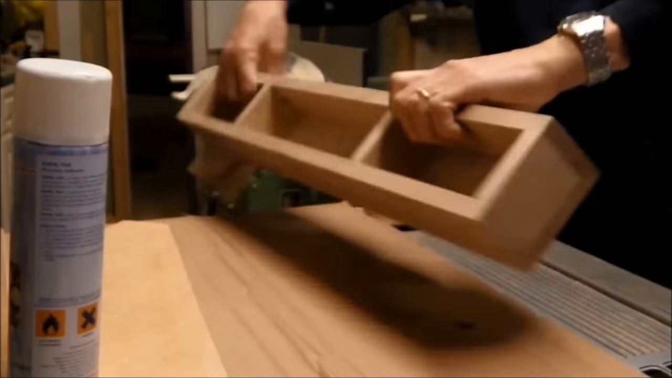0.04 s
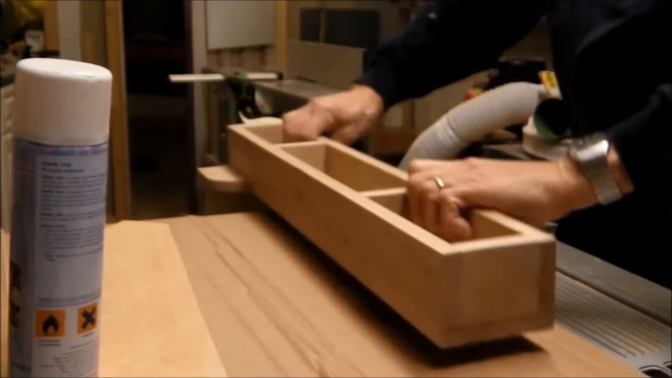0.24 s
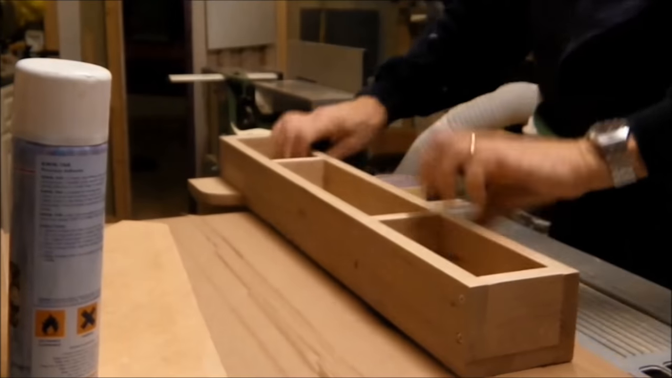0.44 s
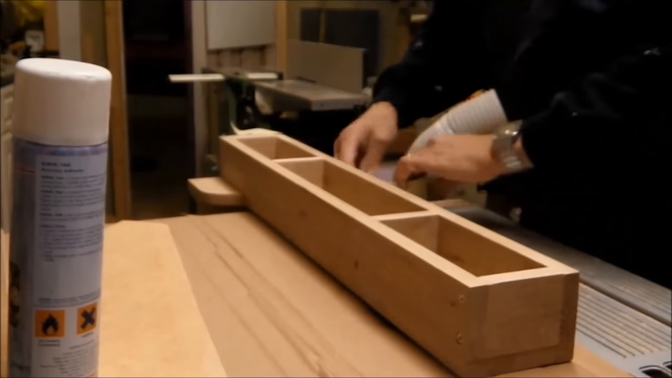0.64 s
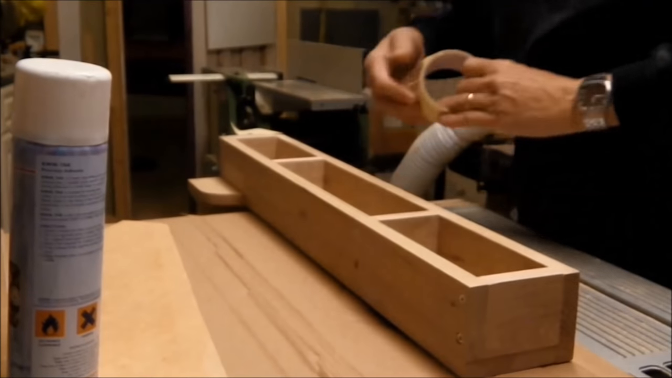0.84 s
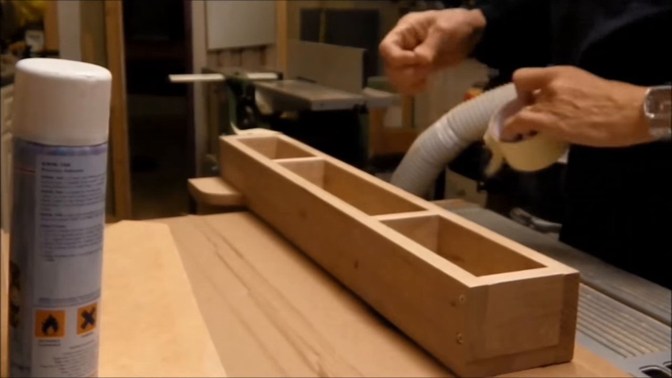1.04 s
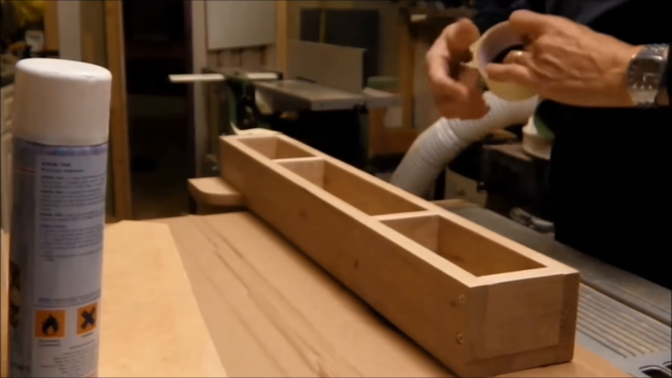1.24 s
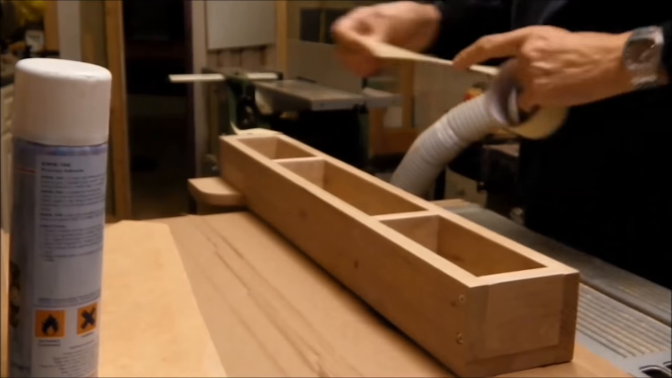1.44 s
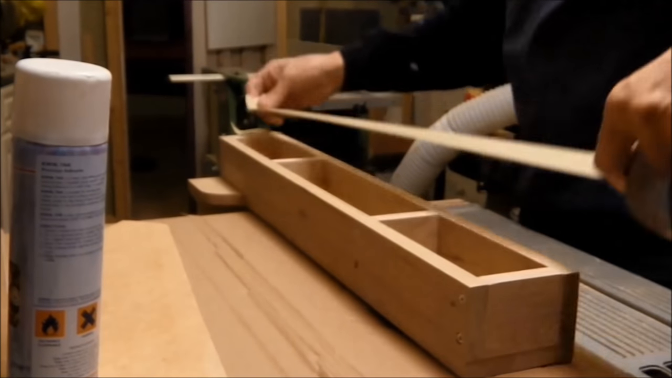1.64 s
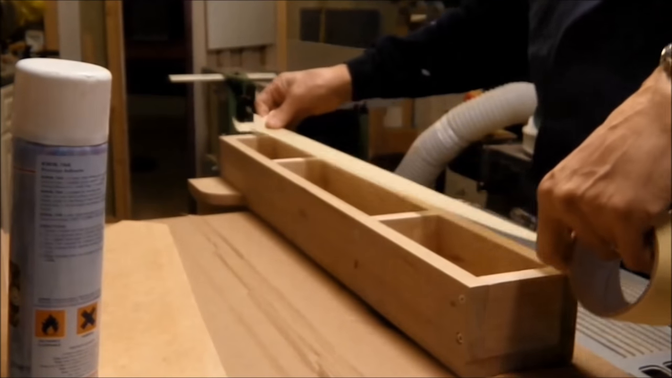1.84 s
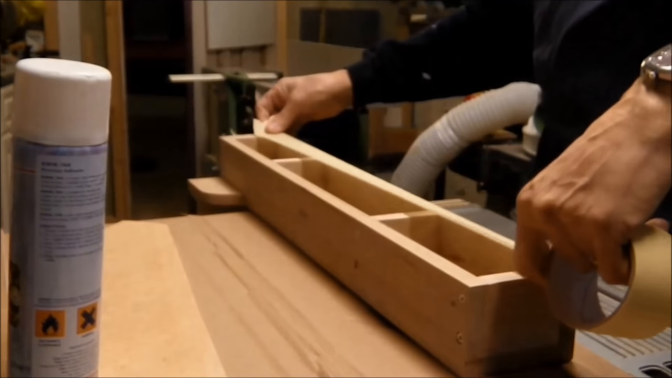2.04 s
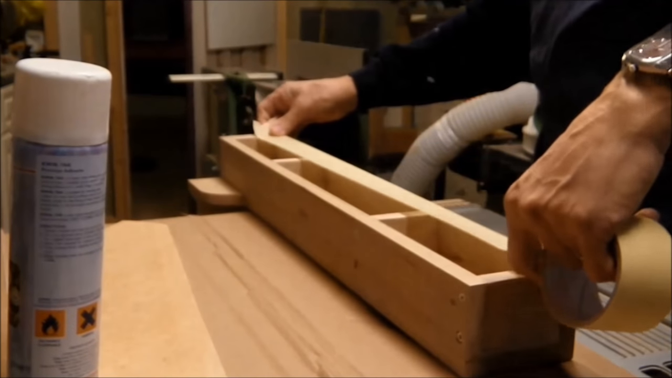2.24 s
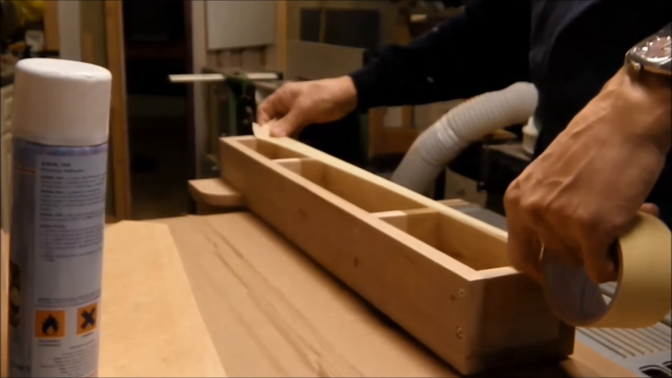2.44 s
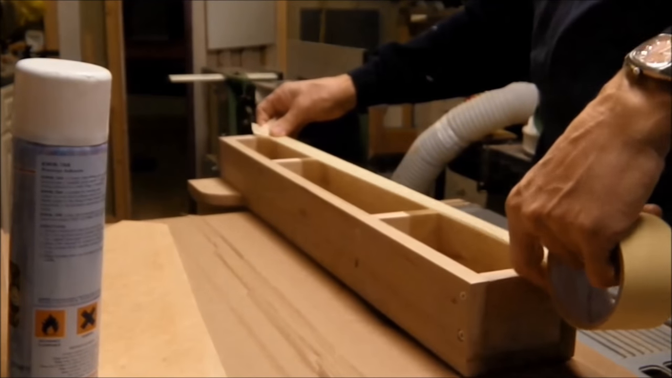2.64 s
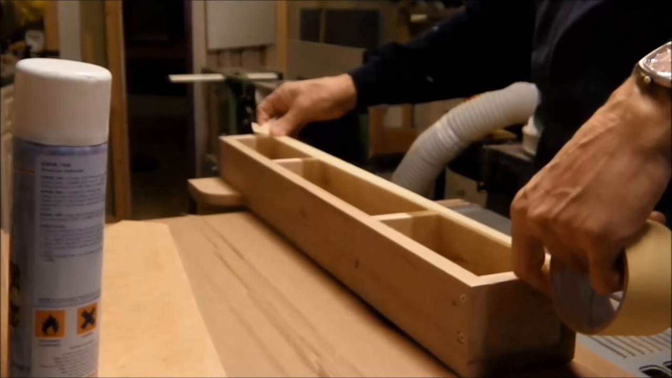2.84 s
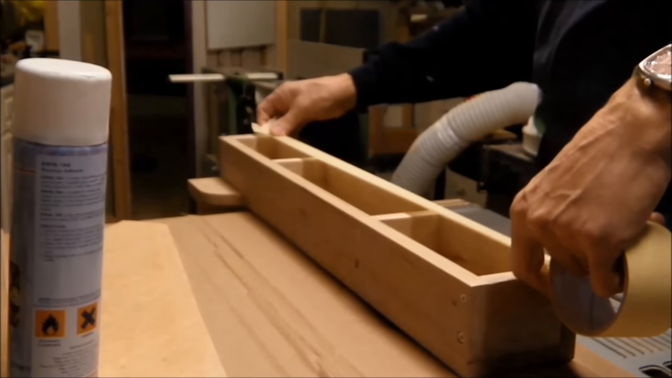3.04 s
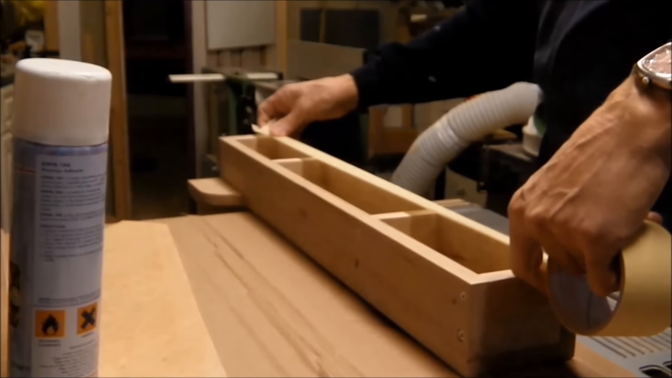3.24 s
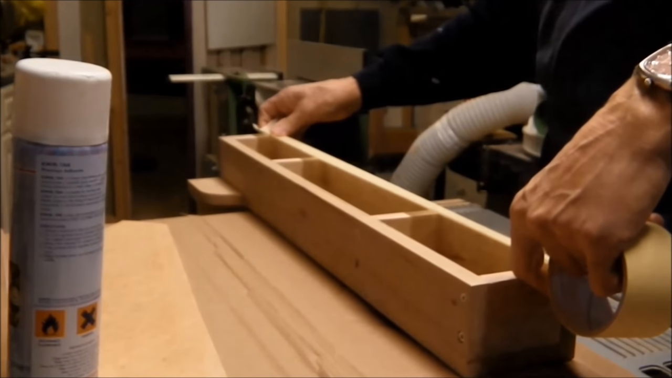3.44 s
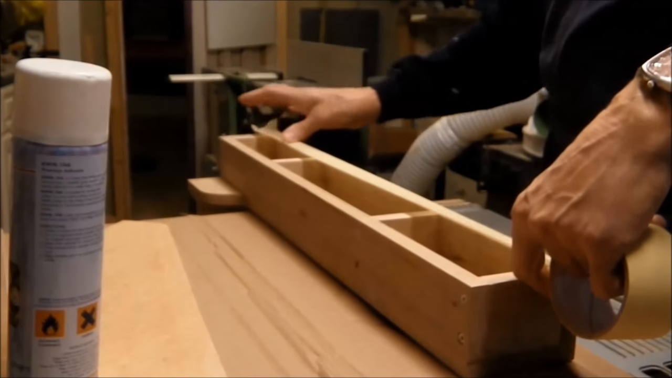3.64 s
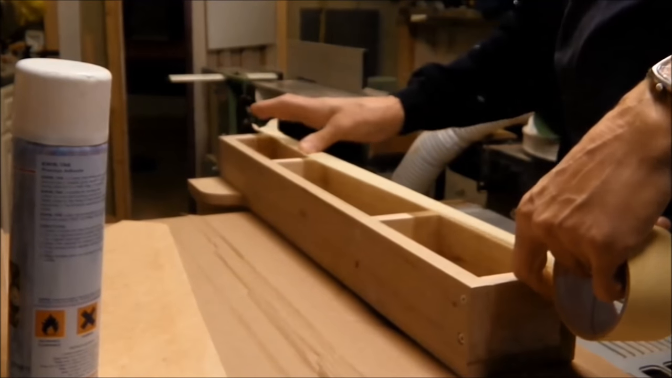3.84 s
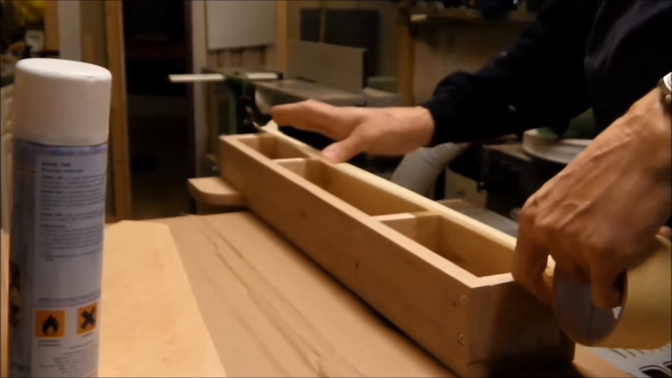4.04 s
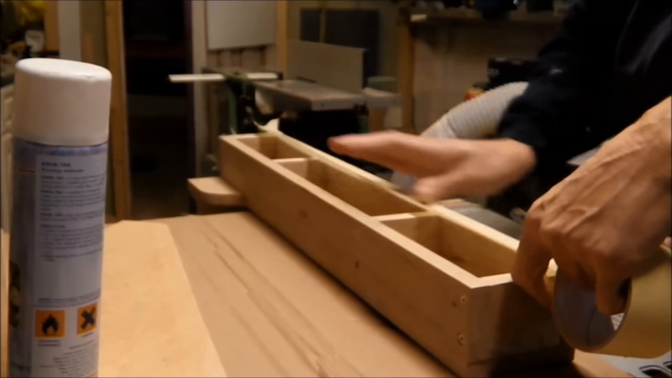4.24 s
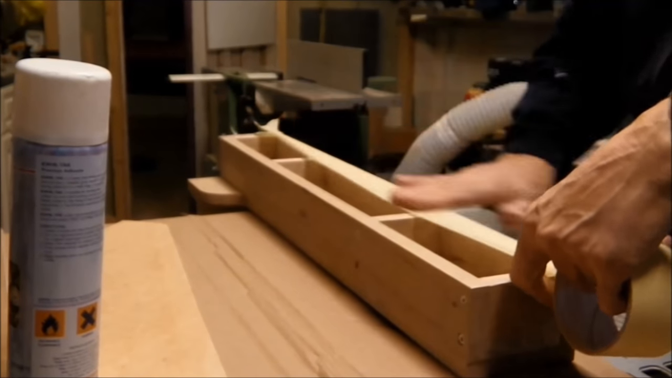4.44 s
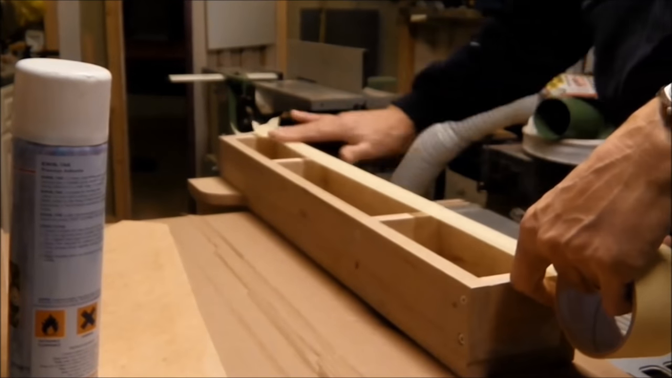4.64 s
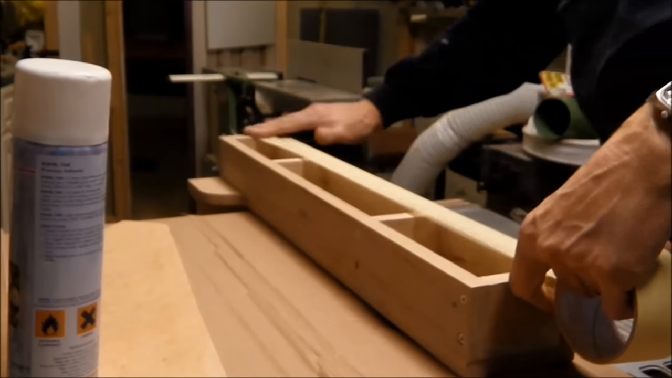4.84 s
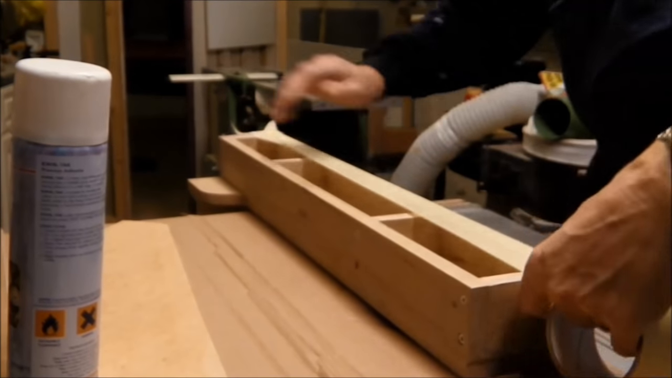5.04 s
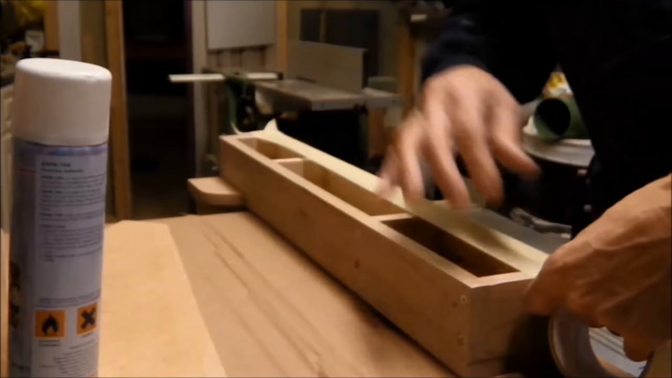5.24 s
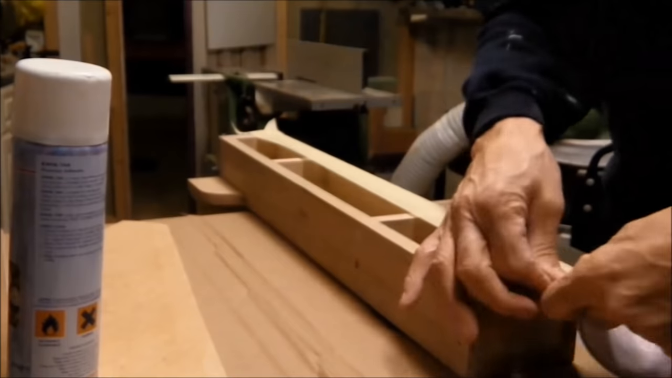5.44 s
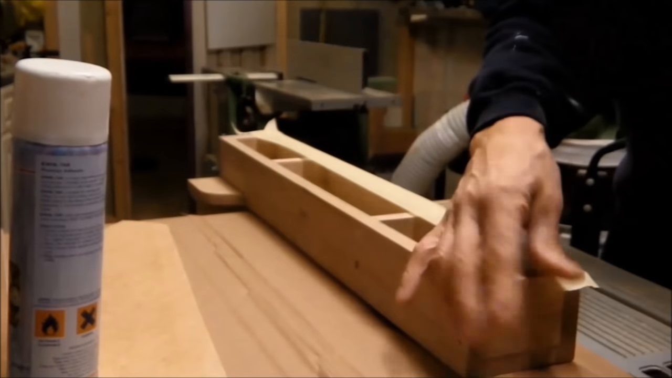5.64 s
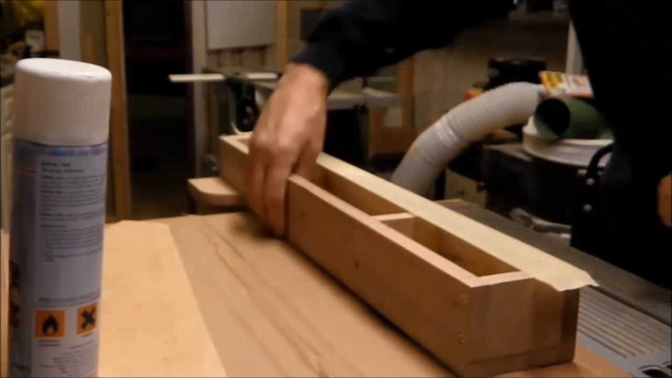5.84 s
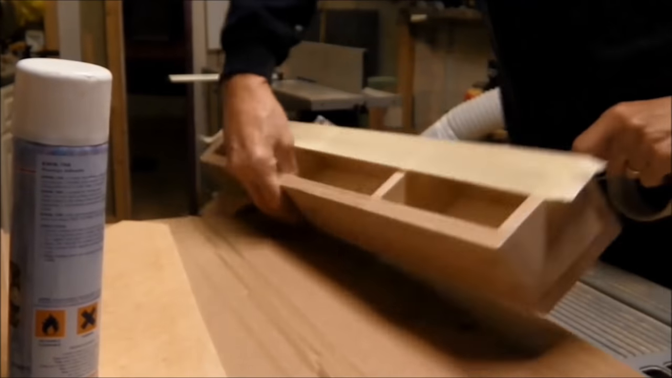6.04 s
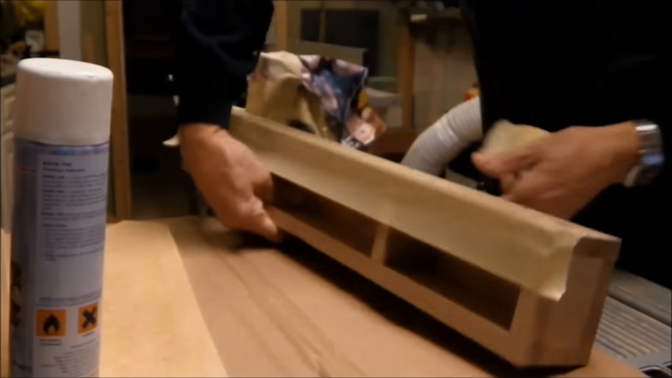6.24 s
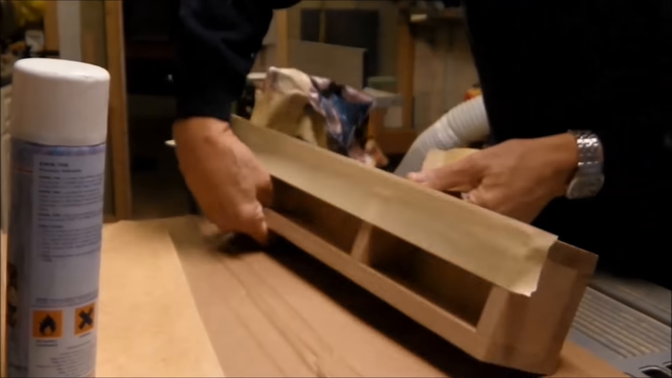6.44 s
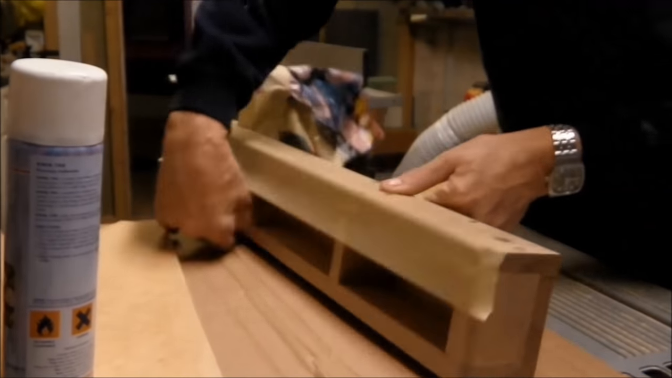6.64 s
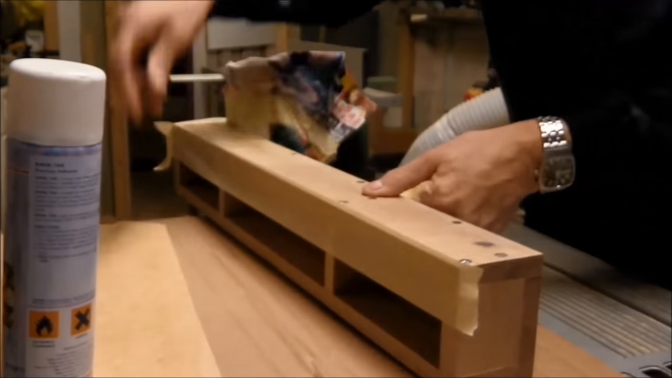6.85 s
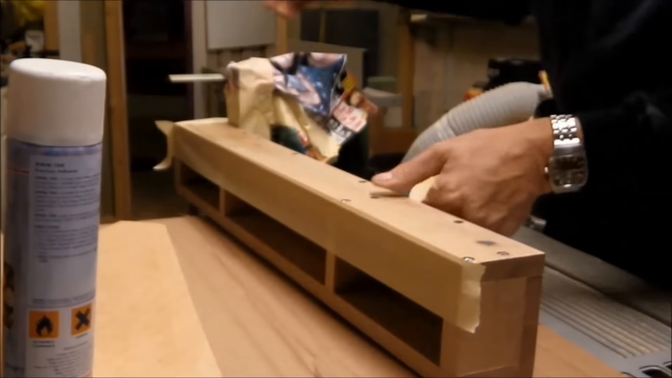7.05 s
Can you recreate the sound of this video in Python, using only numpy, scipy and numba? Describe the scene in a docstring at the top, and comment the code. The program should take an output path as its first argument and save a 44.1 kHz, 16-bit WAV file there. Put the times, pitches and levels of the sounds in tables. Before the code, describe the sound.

In a quiet, faintly humming workshop, tape peels and crinkles, a palm swishes along it, tape snaps off, and a hollow wooden box tumbles with knocks.

```python
"""Taping a wooden box

A wooden box is set down on a workbench; masking tape is peeled off its roll, laid along the box, rubbed down
and torn off; the box is then rolled over with knocks, in a small faintly humming workshop. Rubbing and peeling
are random stick-slip grains, and the treble is bright near 12 kHz; blows are bouncing touches that ring the
modes of what they hit; snapping glue is filtered ticks, and the workshop is coloured noise. Blows and ticks get
a short diffuse tail."""
import sys
import numpy as np
from scipy import signal
from scipy.fft import rfft, irfft
from scipy.io import wavfile
from scipy.ndimage import uniform_filter1d
from numba import njit

SR = 44100
rng = np.random.default_rng(int(sys.argv[2]) if len(sys.argv) > 2 else 0)


def master_out(mix):
    """Clip the mix to full scale and print it as 16-bit PCM to the path in sys.argv[1]."""
    frames = np.transpose(np.atleast_2d(mix))
    ceiling = np.clip(frames, -1, 1)
    pcm = np.round(ceiling * 32767).astype(np.int16)
    wavfile.write(sys.argv[1], SR, pcm)


N = 313551
T = np.arange(N) / SR
# modes of the wooden box: (frequency [Hz], level [dB], t60 [s])
BOX = [(326, -6, 0.068), (490, -4, 0.042), (590, 5, 0.033), (766, 3, 0.014), (1086, 5.5, 0.0081),
       (1497, -4, 0.035), (1785, -2, 0.0099), (2097, 1, 0.0077), (2640, 9, 0.0044), (3220, 6, 0.0038),
       (3760, 6.5, 0.0023)]


def undb(db):
    """Decibels to amplitude."""
    return 10 ** (np.asarray(db) / 20)


def unit(x):
    """Scale to an rms of 1."""
    return x / np.sqrt(np.mean(x ** 2))


def peaked(x):
    """Scale to a peak of 1."""
    return x / np.abs(x).max()


def colour(x, points):
    """Filter to a spectrum given as (Hz, dB) points, joined along log frequency."""
    hz, db = np.transpose(points)
    f = np.fft.rfftfreq(N, 1 / SR) + 1
    gain = undb(np.interp(np.log(f), np.log(hz), db))
    return irfft(rfft(x) * gain, N)


def butter(x, hz, kind, order=4):
    """Butterworth filter with its corners kept inside the usable range."""
    corners = np.clip(hz, 20, .45 * SR)
    return signal.sosfilt(signal.butter(order, corners, kind, fs=SR, output="sos"), x)


@njit
def svf(x, hz, width):
    """Band-pass whose centre may move, gain 1 at the centre."""
    y, band, low = np.empty(len(x)), 0., 0.
    for i in range(len(x)):
        g, k = np.tan(np.pi * hz[i] / SR), width / hz[i]
        v = (band + g * (x[i] - low)) / (1 + g * (g + k))
        band, low, y[i] = 2 * v - band, low + 2 * g * v, k * v
    return y


def noise_band(hz, width):
    """Noise in one fixed resonance, rms 1."""
    return unit(svf(rng.standard_normal(N), np.full(N, 1. * hz), 1. * width))


def walk(rate):
    """Random levels held 1 / rate s and slewed; spread near 1."""
    hold = int(SR / rate)
    steps = np.repeat(rng.standard_normal(N // hold + 1), hold)
    return 1.65 * uniform_filter1d(steps, hold)[:N]


def grains(rate, spread_db):
    """Tiny slips at random moments, rate per second, whose sizes scatter exponentially in dB."""
    chance, size, sign = rng.random(N), rng.exponential(size=N), rng.standard_normal(N)
    return (chance < rate / SR) * sign * undb(spread_db * np.minimum(size, 5))


def ring(x, modes, shares_db=0, detune=1):
    """Decaying modes excited by x; none dies faster than a t60 of 4 ms."""
    out, ones = np.zeros(len(x)), np.ones(len(modes))
    for (hz, db, t60), share_db, shift in zip(modes, shares_db * ones, detune * ones):
        r = np.exp(-np.log(1000) / (max(t60, .004) * SR))
        w = 2 * np.pi * hz * shift / SR
        mode = signal.lfilter([np.sin(w)], [1, -2 * r * np.cos(w), r * r], x)
        out += undb(db + share_db) * mode
    return out


def touch(contact, first):
    """One sharp touch, then an uneven rattle of small bounces that dies over the contact time [s]."""
    size = SR // 4
    bounces = undb(4.4 * np.repeat(rng.standard_normal(size // 64 + 1), 64)[:size])
    push = rng.standard_normal(size) * bounces * np.exp(-T[:size] / max(contact, 2e-4))
    push[0] = first
    return push


def strike(tone, crack, crack_db):
    """A blow is the ringing of the object plus the dry crack of the contact."""
    return peaked(tone) + undb(crack_db) * peaked(crack)


def place(out, s, db, sound):
    """Add a sound at its moment, scaled to its peak level."""
    out[int(s * SR):][:len(sound)] += undb(db) * peaked(sound)


def friction(gains, points, rate, spread_db, patchy_db, box_db):
    """Stick-slip grains: the surface hisses, the object underneath sounds the lower part and rings the box."""
    slips = colour(grains(rate, spread_db), points) * undb(patchy_db * walk(60))
    hiss = unit(butter(slips, 5000, "high"))
    body = unit(butter(slips, 5000, "low"))
    body = unit(body + undb(box_db) * unit(ring(body, BOX)))
    return hiss * gains[0] + body * gains[1]


def pushes(rows, rise, fall):
    """Gains of hiss and body: each push speeds up and slows down along a quarter sine, bent by a power."""
    gains = np.zeros((2, N))
    for start, fastest, end, db, rel_db in rows:
        speed = np.sin(np.pi / 2 * np.interp(T, [start, fastest, end], [0, 1, 0]))
        gains += np.outer(undb([db, db + rel_db]), speed ** np.where(T < fastest, rise, fall))
    return gains


def curve(rows):
    """Gains of hiss and body along a table, silent outside it."""
    s, db, rel_db = np.transpose(rows)
    return undb([np.interp(T, s, v, -200, -200) for v in (db, db + rel_db)])


def taps(rows, modes, rattle_db):
    """Light blows that ring a few short modes, with a dry rattle across them."""
    out, hz = np.zeros(N + SR), np.array(modes)[:, 0]
    for s, db, contact in rows:
        push = touch(contact, 17.4)
        rattle = butter(push, [hz.min() / 1.1, hz.max() * 1.02], "band", order=2)
        blow = strike(ring(push, modes), rattle, rattle_db)
        place(out, s, db, butter(blow, [hz.min() / 1.2, hz.max() * 1.14], "band", order=3))
    return out[:N]


def shop():
    """Smooth hiss over a low rumble with a few wavering hum bands; the hiss shares a part of the rumble's dips."""
    # colour of the workshop's hiss: (frequency [Hz], level [dB per Hz])
    hiss_colour = [(150, -47), (250, -3), (971, -5.5), (1670, -2.5), (1950, -2.5), (5440, -8), (10000, -8),
                   (16000, -9.5)]
    # the workshop's bass: (time [s], level [dB])
    rumble_level = [(0, -62.5), (1.5, -73), (3.2, -77), (5.6, -71.5), (6.1, -68.5), (7.11, -73.5)]
    # colour of the bass: (frequency [Hz], level [dB per Hz])
    rumble_colour = [(20, -13), (59, -8.5), (92, -4.5), (173, -4), (250, -13), (400, -70)]
    # hum bands: (frequency [Hz], width [Hz], level over the plain rumble [dB])
    hum = [(93.4, 7.1, 0), (147, 8, -11), (405, 82, 9.5), (1017, 22, 8.5)]
    # brief dips of the background: (time [s], depth [dB], recovery [s])
    dips = [(1.53, 36, 0.58), (5.66, 28.5, 0.27)]
    fall_s, base_hiss_db = 0.017, -47.5
    s, db = np.transpose(rumble_level)
    rumble_db = np.interp(T, s, db)
    for at, depth_db, recovery in dips:
        rumble_db = rumble_db - np.interp(T, [at, at + fall_s, at + fall_s + recovery], [0, depth_db, 0])
    hiss_db = base_hiss_db + 0.39 * (rumble_db - db.mean()) + 1.33 * walk(4.49)
    hiss = unit(colour(rng.standard_normal(N), hiss_colour)) * undb(hiss_db)
    rumble = unit(colour(rng.standard_normal(N), rumble_colour))
    for hz, width, hum_db in hum:
        rumble += undb(hum_db) * noise_band(hz, width)
    return hiss + rumble * undb(rumble_db)


def echo(dry):
    """Walls and shelves return the sound as a short diffuse tail."""
    t60_s, gap_s = .22, .003
    t = np.arange(SR // 2) / SR
    tail = rng.standard_normal(len(t)) * np.exp(-np.log(1000) * t / t60_s) * (t > gap_s)
    return signal.fftconvolve(dry, tail / np.sqrt(np.sum(tail ** 2)))[:N]


def squeaks():
    """Brief fading tones, blurred by a band of noise that widens the rougher the rubbed edge is."""
    # short narrow squeaks: (start [s], end [s], frequency [Hz], roughness [ratio], rms before the fade [dB])
    squeak_rows = [(2.69, 3.08, 2353, 0.11, -57.5), (5.823, 5.907, 3450, 1.2, -43.5),
                   (5.967, 5.996, 1620, 0.43, -34), (0.26, 0.334, 2860, 1.8, -37),
                   (0.27, 0.325, 4400, 4, -35), (0.584, 0.964, 419, 0.1, -59),
                   (5.614, 5.667, 3370, 3.5, -24.5), (5.833, 5.887, 1432, 1.2, -45.5),
                   (5.854, 5.98, 4060, 6, -47.5), (6.917, 7.106, 1030, 2.085, -53),
                   (6.953, 7.114, 4540, 3, -44), (0.255, 0.321, 1055, 4.6, -34)]
    out = np.zeros(N)
    for start, end, hz, rough, db in squeak_rows:
        gate = np.clip(np.minimum(T - start, end - T) / 0.0097, 0, 1)
        tone = np.sin(2 * np.pi * hz * T) + rough * noise_band(hz, hz * (1 + rough) / 60)
        fade_db = -6.0 * min(rough, 1) * np.clip((T - start) / (end - start), 0, 1)
        out += undb(db) * gate * unit(tone) * undb(fade_db)
    return out


def slide():
    """The box slides on the bench: its wood scrapes and resonates with every push."""
    # pushes: (start [s], fastest [s], end [s], surface hiss [dB], body minus hiss [dB])
    slide_rows = [(0, .06, 0.19, -34, -7.5), (.14, .17, 0.21, -33, -19), (.195, .215, 0.29, -43, 6.5),
                  (.24, .295, 0.37, -40, 4.5), (.26, .42, 0.63, -31.5, -4), (.56, .68, 2, -51, -2),
                  (5.96, 6.0, 6.07, -33.5, -3.5), (6.04, 6.09, 6.28, -31.5, -9),
                  (6.16, 6.27, 6.34, -25, -7.5), (6.3, 6.4, 6.66, -34, 1.5), (6.5, 6.6, 6.74, -25.5, -8),
                  (6.6, 6.74, 7.19, -32, -5), (6.91, 7.0, 7.14, -46, -3)]
    # colour of box on bench: (frequency [Hz], level [dB per Hz])
    slide_colour = [(180, -56), (300, -25.5), (885, -9.5), (1870, -4.5), (2140, -3.5), (2740, -6.5),
                    (12300, 16), (16000, 10.5)]
    gains = pushes(slide_rows, rise=1.5, fall=2.35)
    return friction(gains, slide_colour, rate=9000, spread_db=2.0, patchy_db=1.6, box_db=2.5)


def clinks():
    """Harder, brighter blows on the bench's metal rail: its modes, each slightly detuned at random per blow."""
    # touches of box and rail: (time [s], peak [dB], high modes minus low modes [dB], length of the contact [s])
    clink_rows = [(0.0055, -18, -3, 0.0079), (0.204, -17.5, 7, 0.0075), (6.2364, -9, 5.5, 0.009),
                  (6.354, -10, -2, 0.0041), (6.441, -15, 0, 0.0045), (6.689, -9.5, 3, 0.0065),
                  (6.836, -3.5, 2, 0.0084), (6.855, -11.5, 3, 0.0074), (7.011, -24, -4, 0.0053)]
    # modes of the rail: (frequency [Hz], level [dB], t60 [s])
    rail = [(1013, -0.5, 0.055), (1242, 3.5, 0.04), (2204, 3.5, 0.023), (4330, -1, 0.021),
            (4750, -1.5, 0.018), (6000, 2.5, 0.019), (6475, -2, 0.039)]
    out, high = np.zeros(N + SR), np.array(rail)[:, 0] > 3000
    for s, db, high_db, contact in clink_rows:
        push = touch(contact, 8.5)
        tone = ring(push, rail, high_db * high, 1 + 0.013 * rng.standard_normal(len(high)))
        crack = butter(push, [900, 8000], "band", order=2)
        place(out, s, db, strike(tone, crack, -4.0))
    return butter(out[:N], 690, "high")


def knocks():
    """Blows favour box modes near their pitch, each detuned and scattered in level at random; plus a crack."""
    # blows on the box: (time [s], peak [dB], favoured pitch [Hz], length of the contact [s])
    knock_rows = [(0.135, -21.5, 1180, 0.026), (0.197, -28, 2150, 0.013), (0.423, -12, 520, 0.009),
                  (0.431, -8, 545, 0.009), (0.449, -13.5, 600, 0.0094), (0.507, -18, 387, 0.019),
                  (5.738, -23, 690, 0.014), (5.991, -26, 2980, 0.0079), (6.1904, -7, 1530, 0.011),
                  (6.316, -14.5, 905, 0.0095), (6.3201, -9.5, 614, 0.013), (6.324, -4.5, 1930, 0.0069),
                  (6.399, -15, 610, 0.03), (6.417, -14, 800, 0.02), (6.494, -19, 590, 0.0085),
                  (6.578, -23.5, 580.3, 0.0096), (6.594, -17, 1800, 0.025), (6.609, -5.5, 600, 0.0096),
                  (6.612, -10, 2450, 0.02), (6.645, -9.5, 525.1, 0.0081), (6.661, -16, 1300, 0.017)]
    out, hz = np.zeros(N + SR), np.array(BOX)[:, 0]
    for s, db, centre_hz, contact in knock_rows:
        push = touch(contact, 7.0)
        chance = rng.standard_normal((2, len(hz)))
        scatter_db, detune = 1.5 * chance[0], 1 + .015 * chance[1]
        # modes weaken with the square of their distance in octaves
        shares_db = -6.5 * np.log2(hz / centre_hz) ** 2 + scatter_db
        tone = ring(push, BOX, shares_db, detune)
        crack = butter(push, [centre_hz / 2.0, 0.84 * centre_hz + 1200], "band", order=3)
        place(out, s, db, strike(tone, crack, -5.5))
    return butter(out[:N], 248, "high")


def roll_taps():
    """The cardboard roll is tapped as it is picked up and rings its few short modes."""
    # taps: (time [s], peak [dB], length of the contact [s])
    tap_rows = [(0.7455, -30, .008), (0.7555, -11, 0.008), (0.7665, -12, 0.0084)]
    # modes of the cardboard roll: (frequency [Hz], level [dB], t60 [s])
    roll = [(2150, 0, 0.026), (3350, 3.5, 0.0086), (3900, -1, 0.0084)]
    return taps(tap_rows, roll, rattle_db=-10.0)


def slap():
    """A slap rings three short, hollow modes."""
    # slap: (time [s], peak [dB], length of the contact [s])
    slap_rows = [(4.9788, -12, 0.011)]
    # modes of the slap: (frequency [Hz], level [dB], t60 [s])
    cup = [(480, -9, 0.028), (1740, 0, 0.012), (2600, 6.5, 0.01)]
    return taps(slap_rows, cup, rattle_db=-4.0)


def hollow():
    """The gap between palm and wood colours slips with a wandering resonance and a second one above it."""
    # the hollow under the moving hand: (time [s], resonance [Hz], level [dB], upper minus lower resonance [dB])
    hollow_path = [(3.7, 1500, -59, 4), (3.8, 1660, -51, 8), (3.89, 1810, -46.5, -1), (3.98, 1520, -58, -4),
                   (4.09, 1500, -44.5, -2), (4.2, 1900, -44, -0.5), (4.27, 1990, -34.5, -8),
                   (4.33, 1660, -41.5, -7), (4.4, 1580, -64, 2), (4.55, 1480, -47.5, 2),
                   (4.67, 1840, -43.5, 0), (4.8, 1710, -60, 15), (4.9, 1490, -72, 4)]
    s, hz, db, high_db = np.transpose(hollow_path)
    slips, centre_hz = grains(9000, 0.72), np.interp(T, s, hz)
    low = unit(svf(slips, centre_hz, 135.0))
    high = unit(svf(slips, centre_hz + 980, 220.0))
    return (low + undb(np.interp(T, s, high_db)) * high) * undb(np.interp(T, s, db, -200, -200))


def palm():
    """The palm rubs in strokes, whose body stops growing when the hiss is loud, and in pats that fade."""
    # one table per stroke: (time [s], hiss [dB])
    strokes = [
        [(3.66, -43.5), (3.75, -36), (3.88, -28), (3.95, -39), (4.0, -53)],
        [(4.0, -57), (4.06, -31), (4.2, -29), (4.28, -21.5), (4.33, -27.5), (4.44, -47)],
        [(4.5, -41), (4.55, -19.5), (4.68, -18.5), (4.83, -23), (4.92, -43), (4.97, -46)],
    ]
    # the hand lands flat on the tape:
    # (time [s], hiss before rise and fade [dB], body minus hiss [dB], rise [s], fade [dB/s])
    pats = [(3.613, -7.5, -16.5, 0.021, 585), (4.466, -31, -9, 0.011, 300),
            (4.9774, -17, -9.5, 0.0014, 477), (5.15, -43.5, -20, .004, 64)]
    # colour of palm on tape: (frequency [Hz], level [dB per Hz])
    palm_colour = [(350, -44), (600, -36), (1290, -21), (1680, -13), (2400, -17), (6550, -11.5),
                   (12200, 1.5), (16000, -3.5)]
    body_db, body_top_db = -11, -43  # body against the hiss while soft; ceiling of the strokes' body
    hiss = sum(undb(np.interp(T, *np.transpose(stroke), -200, -200)) for stroke in strokes)
    body = hiss * undb(body_db)
    gains = np.array([hiss, body / np.hypot(1, body / undb(body_top_db))])
    for s, db, rel_db, rise, fade_db in pats:
        after = np.maximum(T - s, 0)
        shape = np.minimum(after / max(rise, 1e-4), 1) * undb(-fade_db * after)
        gains += np.outer(undb([db, db + rel_db]), shape)
    return friction(gains, palm_colour, rate=19000, spread_db=-1.5, patchy_db=0.95, box_db=-4.0)


def crinkle():
    """The stretched tape crinkles in sparse, uneven slips as it is lined up."""
    # crinkling: (time [s], hiss [dB])
    crinkle_rows = [(2.1, -67), (2.145, -46.5), (2.19, -44), (2.26, -58), (2.35, -45.5), (2.5, -59),
                    (2.57, -45.5), (2.7, -49.5), (2.735, -41), (2.82, -62), (2.89, -48.5), (3.4, -51.5),
                    (3.6, -65)]
    # colour of the crinkling: (frequency [Hz], level [dB per Hz])
    crinkle_colour = [(410, -8), (700, -17), (2270, -3), (2990, -7), (6400, -4.5), (12600, 9), (16000, 4.5)]
    gains = curve([(s, db, -8) for s, db in crinkle_rows])  # body 8 dB under the hiss
    return friction(gains, crinkle_colour, rate=4300, spread_db=3.0, patchy_db=2.3, box_db=-35.0)


def span():
    """The free span of tape sings: coarse, sticky slips in a resonance that moves as the tape comes free."""
    # the singing span: (time [s], resonance [Hz], level [dB])
    span_path = [(1.5, 3820, -30), (1.53, 5300, -22.5), (1.66, 7550, -40), (1.709, 4420, -32.5)]
    s, hz, db = np.transpose(span_path)
    sung = svf(grains(5000, 2.8), np.interp(T, s, hz), 1500.0)
    return unit(sung) * undb(np.interp(T, s, db, -200, -200) + 1.9 * walk(90))


def peel():
    """Fingers pick at the tape, pull it off the roll and tear it: dense slips with a strong surface hiss."""
    # picking: (start [s], fastest [s], end [s], surface hiss [dB], body minus hiss [dB])
    picks = [(.72, .765, 0.87, -36, 1), (.9, 1.06, 1.26, -46.5, 2.5), (1.09, 1.125, 1.23, -30, -11),
             (1.13, 1.29, 1.37, -32.5, 1), (5.24, 5.3, 5.5, -38.5, -9)]
    # one long pull off the roll: (time [s], hiss [dB], body minus hiss [dB])
    pull = [(1.484, -33, -15), (1.499, -31, -21), (1.504, -11.5, -23), (1.56, -13.5, -17.5),
            (1.7, -15.5, -29), (1.76, -37, -11), (1.85, -61, -6)]
    # the tearing off: (time [s], hiss [dB], body minus hiss [dB])
    tear = [(5.4, -48, -26), (5.435, -25.5, -15), (5.47, -27, -16), (5.56, -31.5, -17.5), (5.63, -22, -17),
            (5.655, -14.5, -26), (5.68, -16, -29), (5.695, -29.5, -13), (5.74, -19, -20.5), (5.8, -47, -9)]
    # colour of the peeling: (frequency [Hz], level [dB per Hz])
    peel_colour = [(240, -87), (400, -54.5), (879, -23.5), (1900, -18), (2710, -16.5), (8370, -11.5),
                   (12500, -2.5), (16000, -11.5)]
    gains = pushes(picks, rise=1.84, fall=4.6) + curve(pull) + curve(tear)
    return friction(gains, peel_colour, rate=18000, spread_db=-0.2, patchy_db=1.07, box_db=-1.5)


def snaps():
    """Glue lets go in a tick of about a millisecond, then the paper tape rattles faintly; tearing adds a pop."""
    # the adhesive snaps: (time [s], peak [dB], centre of the tick [Hz])
    snap_rows = [(1.0985, -4.5, 12400), (1.1266, 2.5, 14800), (2.1868, -16.5, 13600), (2.377, -25, 12300),
                 (2.7245, -22, 9100), (2.868, -17, 13000), (3.147, -19.5, 12500), (3.184, -21.5, 11300),
                 (3.3776, -20.5, 11600), (5.1498, -15, 11400), (5.2586, -13, 12400), (5.269, -16, 12300),
                 (5.283, -1.5, 7500), (5.334, -15, 12100), (5.3452, -10.5, 12600), (5.3733, -9.5, 14000),
                 (5.4155, -3.5, 12200), (5.4308, -2, 13400), (5.46, -9, 13700), (5.475, -2, 12000),
                 (5.4844, -6, 5200), (5.489, -2.5, 4970), (5.52, -3, 5830), (5.53, -1.5, 6400),
                 (5.573, -10, 9400), (5.604, 0, 12800), (5.622, -2, 9100), (5.594, -11, 5000),
                 (5.739, 0.5, 11800), (5.7671, -1.5, 13550), (5.986, -18, 3170), (6.006, -10.5, 11700)]
    # the tape tears through with a dull pop: (time [s], peak [dB])
    pop = [(5.628, -9.5)]
    out, size = np.zeros(N + SR), SR // 8
    t = np.arange(size) / SR
    for s, db, centre_hz in snap_rows:
        push = undb(-30) * rng.standard_normal(size) * np.exp(-t / .008)
        push[0] = 1
        ping = butter(push, [centre_hz / 1.09, centre_hz * 1.07], "band", order=2)
        wide_hz = [max(centre_hz / 2.33, centre_hz - 4500), centre_hz * 1.93]
        place(out, s, db, ping + undb(-3.0) * butter(push, wide_hz, "band", order=4))
    for s, db in pop:
        place(out, s, db, np.exp(-t / 0.000079))
    return out[:N]


def scene():
    """Rubbing, blows and ticks in the workshop; only blows and ticks feed the room tail."""
    rubbing = slide() + hollow() + palm() + crinkle() + span() + peel()
    blows = clinks() + knocks() + roll_taps() + slap()
    ticks = snaps()
    tail = undb(-6.5) * echo(blows + undb(-4) * ticks)
    return (shop() + squeaks() + tail + rubbing + blows + ticks)[None]


def record(dry):
    """The recorder rounds only the tallest peaks, near full scale, and cuts the top above 15870 Hz."""
    rounded = dry / (1 + dry ** 12) ** (1 / 12)
    return signal.sosfilt(signal.ellip(12, .2, 80, 15870, fs=SR, output="sos"), rounded)


dry = scene()
out = record(dry)
master_out(out)
```